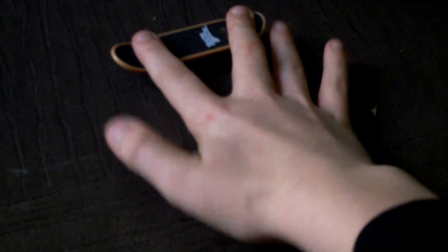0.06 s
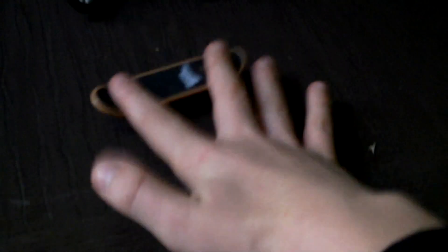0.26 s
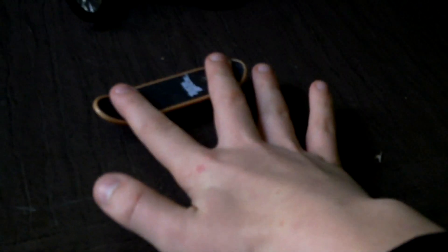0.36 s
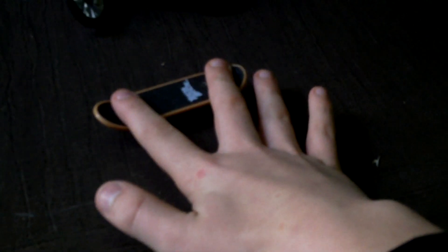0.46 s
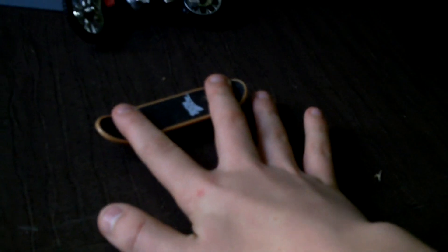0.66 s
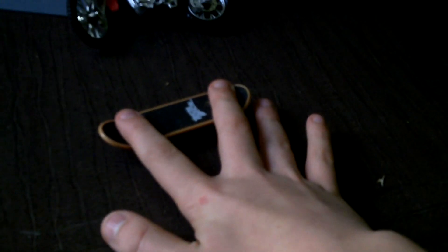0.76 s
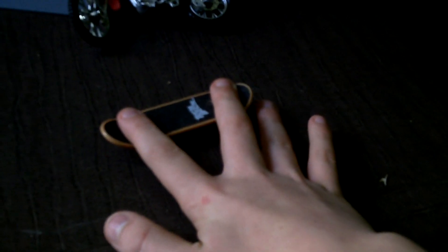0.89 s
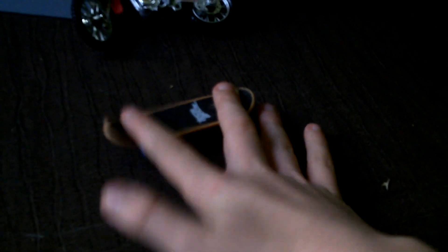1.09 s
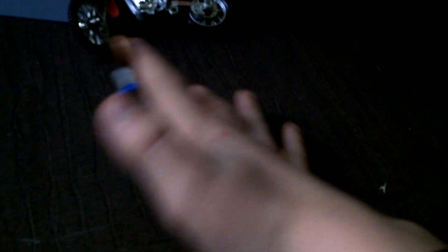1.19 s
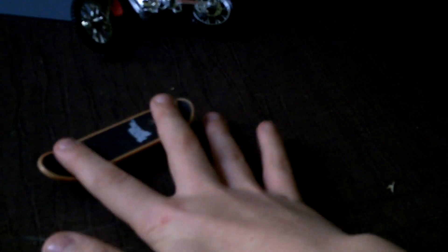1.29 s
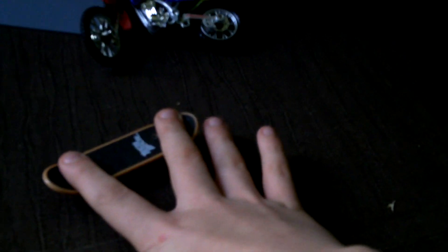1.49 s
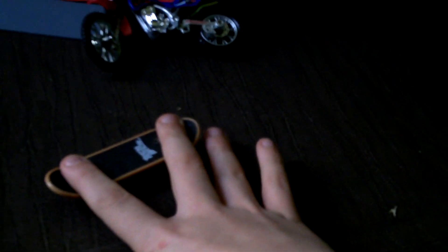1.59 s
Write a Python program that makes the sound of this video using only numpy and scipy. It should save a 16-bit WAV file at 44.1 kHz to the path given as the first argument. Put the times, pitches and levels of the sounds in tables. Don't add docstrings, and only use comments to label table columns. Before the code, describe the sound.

A finger-sized toy skateboard is popped and landed twice on a hard floor. A metallic tick at 0.18 s and a swelling scrape lead to a tail snap at 0.23, then two loud, bright clacks at 0.32 and 0.35 with dull thuds. After near silence, a rattle at 1.19, a snap at 1.25, and clacks at 1.33 and 1.37. Close small microphone, short room echoes, steady faint hiss.

```python
import sys
import numpy as np
from scipy import signal
from scipy.fft import rfft, irfft
from scipy.io import wavfile
from scipy.ndimage import uniform_filter1d

SR = 44100
rng = np.random.default_rng(int(sys.argv[2]) if len(sys.argv) > 2 else 0)


def materialize(psi):
    bounded = np.clip(np.atleast_2d(psi).T, -1, 1)
    quanta = np.round(bounded * 32767).astype(np.int16)
    wavfile.write(sys.argv[1], SR, quanta)


def convert_level_to_amplitude(level_db):
    exponent = np.asarray(level_db, float) / 20
    return 10 ** exponent


N = 72765


def level(x, db):
    return x * convert_level_to_amplitude(db) / np.sqrt(np.mean(x ** 2))


def unit(x):
    return x / np.sqrt(np.sum(x ** 2))


def band(x, hz, width):
    hz = min(hz, 0.45 * SR)
    return signal.lfilter(*signal.iirpeak(hz, hz / max(width, 20), fs=SR), x)


def walk(rate):
    hold = int(SR / rate)
    steps = np.repeat(rng.standard_normal(N // hold + 1), hold)
    return uniform_filter1d(steps, hold)[:N]


def contacts(rows, ring):
    size = 4096
    chatter_db, rough_db = -14, 2.5
    skirt, narrow = 2.9, 0.98
    t = np.arange(size) / SR
    start = int(rows[0][0] * SR)
    pushes = []
    for at_s, db, chatter_ms, tilt_db in rows:
        grain, rough = rng.standard_normal((2, size))
        push = grain * convert_level_to_amplitude(chatter_db + rough_db * rough) * np.exp(-t * 1000 / chatter_ms)
        push[0] = 1
        lag = max(int(at_s * SR) - start, 0)
        pushes.append((np.pad(push, (lag, 0))[:size] * convert_level_to_amplitude(db), tilt_db))
    hit = np.zeros(size)
    for k, (hz, width, db) in enumerate(ring):
        octaves = np.log2(hz / 4000)
        push = sum(p * convert_level_to_amplitude(tilt_db * octaves) for p, tilt_db in pushes)
        tone = band(band(push, hz, width * skirt), hz, width * narrow)
        hit += (-1) ** k * convert_level_to_amplitude(db) * unit(tone) * np.sqrt(width)
    loudest_db = max(row[1] for row in rows)
    out = np.zeros(N + size)
    out[start:start + size] = hit * convert_level_to_amplitude(loudest_db) / np.abs(hit).max()
    return out[:N]


# start in seconds, level in dB, chatter in ms, brightness in dB per octave.
FRONT_WHEELS = [(0.3236, -21, .7, -2), (0.3246, -22, .7, 2), (0.3252, -27, .5, -3), (0.3276, -35, 1., 3),
                (0.3302, -36, 1., 3), (0.3314, -38, .6, 5)]
NOSE_WHEELS = [(1.3329, -30, .6, -1), (1.3339, -19, .5, 1), (1.3355, -29, .5, -4), (1.3368, -29, .5, 0)]
BACK_WHEELS = [(0.3469, -28, .2, 0), (0.3472, -16, .3, 1), (0.3480, -22, .4, -3), (0.3486, -24, .4, -5),
               (0.3494, -27, .4, -4), (0.3500, -30, .3, -3)]
TAIL_WHEELS = [(1.3669, -27, .4, 2), (1.3675, -20, .4, 0), (1.3680, -23, .3, 0), (1.3686, -26, .5, -4),
               (1.3691, -27, .4, -3), (1.3700, -29, .4, -3)]
# centre in Hz, width in Hz, level in dB.
FRONT_RING = [(793, 147, -10), (1570, 160, -0.5), (2295, 220, 1.5), (3500, 220, -6.5), (4518, 280, 2.5),
              (5490, 300, -5), (6260, 210, 0), (6800, 450, 0), (9240, 1150, -8.5), (10840, 1400, -13),
              (12650, 1400, -16), (14700, 590, -24)]
NOSE_RING = [(517, 94, -18), (878, 123, -1), (1570, 240, -1.1), (2240, 310, -9), (3380, 380, -10.5),
             (4600, 230, -8), (5640, 270, -10.5), (6580, 260, 2), (7110, 190, -3), (9030, 830, -8.5),
             (10464, 560, -2.5), (11200, 740, -10), (12800, 410, -9), (14900, 800, -20)]
BACK_RING = [(807, 310, -9.5), (1200, 175, -2.5), (1704, 340, -2), (1947, 360, 1), (3264, 200, -3.5),
             (4500, 520, -13), (5390, 250, -4), (6060, 1270, -9), (7220, 620, -5.5), (9350, 1000, -10),
             (10430, 590, -5.5), (12070, 1200, -9.5), (13700, 1000, -25)]
TAIL_RING = [(826, 1070, -4), (1440, 1440, 2), (2320, 990, 1.5), (3350, 560, -3.5), (5170, 500, -1),
             (5730, 340, -2), (6130, 1130, -0.5), (7290, 530, 3), (9000, 630, -7), (10800, 520, -2),
             (12560, 1550, -10.5), (13760, 510, -11)]


def landings():
    return [(convert_level_to_amplitude(0.8) * contacts(FRONT_WHEELS, FRONT_RING), -2),
            (convert_level_to_amplitude(1.1) * contacts(NOSE_WHEELS, NOSE_RING), -2),
            (convert_level_to_amplitude(-0.6) * contacts(BACK_WHEELS, BACK_RING), -2.15),
            (convert_level_to_amplitude(0.2) * contacts(TAIL_WHEELS, TAIL_RING), -1.5)]


# start in seconds, level in dB, chatter in ms, brightness in dB per octave.
POPS = [(0.2338, -34, 1.2, -1), (0.2346, -35.5, 1.5, -1), (0.2367, -43, 1.5, 1), (0.2387, -42, 1.5, 2),
        (0.2425, -46, 2.5, 3)]
SNAPS = [(1.2505, -32, 1.0, -1), (1.2513, -34, 1.5, 0), (1.2532, -39, 1.5, 1), (1.2558, -39, 1.5, 2)]
# centre in Hz, width in Hz, level in dB.
POP_RING = [(440, 85, -11.5), (790, 230, -8.5), (1450, 300, -7.5), (2120, 300, -1), (2690, 860, -5),
            (3200, 370, 5), (4340, 440, 0.5), (6330, 620, -4), (7070, 300, 0), (8300, 1600, -9),
            (10200, 1100, -9), (12540, 950, -10.5), (14200, 520, -17)]
SNAP_RING = [(438, 120, -11), (1070, 140, -22), (1670, 166, -4.5), (2100, 160, -4.5), (3010, 480, 0),
             (3860, 350, -12), (4440, 430, -6), (5730, 610, -7), (7050, 440, -3.5), (8350, 940, -19),
             (9940, 950, -8.5), (12130, 540, -11), (13600, 800, -17)]


def tail_pops():
    return [(convert_level_to_amplitude(0.1) * contacts(POPS, POP_RING), 0),
            (convert_level_to_amplitude(0.93) * contacts(SNAPS, SNAP_RING), 0)]


# start in seconds, level in dB, chatter in ms, brightness in dB per octave.
THUDS = [
    (0.2368, -72, 2.6, 0),
    (0.324, -48, 1.1, 0),
    (0.3476, -43.5, 3.1, 0),
    (1.2504, -56.5, 4.1, 0),
    (1.335, -48.5, 1.46, 0),
    (1.3671, -38, 0.93, 1),
]
# centre in Hz, width in Hz, level in dB.
THUD_RING = [(290, 250, -11.5), (522, 200, 0), (805, 260, -0.5), (1363, 820, 0.5)]


def floor_thuds():
    return sum(contacts([row], THUD_RING) for row in THUDS)


# start in seconds, level in dB, chatter in ms, brightness in dB per octave.
TICKS = [
    (0.1837, -45, 1.5, 0),
    (0.3190, -57, .6, 2),
]
RATTLES = [
    (1.1912, -52, .8, 2),
    (1.1934, -46, 1.6, 1),
    (1.2390, -55, .8, 5),
]
# centre in Hz, width in Hz, level in dB.
TICK_RING = [(3670, 620, 0.5), (5750, 400, -3), (7050, 730, 9.5), (9200, 2100, -5), (12100, 1400, -4),
             (13000, 640, -9)]
RATTLE_RING = [(4700, 400, 1.5), (6000, 500, -1), (6960, 690, 3.5), (9860, 600, -1), (10700, 450, -1),
               (11900, 980, -3), (13600, 1700, -11)]


def truck_ticks():
    ticks = sum(contacts([row], TICK_RING) for row in TICKS)
    return ticks + sum(contacts([row], RATTLE_RING) for row in RATTLES)


# start in seconds, end in seconds, level at the end in dB,
# rise up to the end in dB.
SCRAPES = [
    (0.186, 0.231, -55, 26),
    (1.212, 1.27, -81, -15),
]
# centre in Hz, width in Hz, level in dB.
SCRAPE_RING = [(464, 100, -7), (779, 78, 2), (1583, 270, 0.5), (2005, 120, -3), (3630, 1200, -3),
               (7300, 630, -24)]


def scrapes():
    t = np.arange(N) / SR
    env = np.zeros(N)
    for t0, t1, db, rise_db in SCRAPES:
        to_go = np.clip((t1 - t) / (t1 - t0), 0, 1)
        onset = np.clip((t - t0) / 0.003, 0, 1)
        env += convert_level_to_amplitude(db - rise_db * to_go) * onset * (t < t1)
    grit = rng.standard_normal(N) * convert_level_to_amplitude(0.88 * walk(200))
    rung = sum(convert_level_to_amplitude(db) * band(grit, hz, width) / np.sqrt(width) for hz, width, db in SCRAPE_RING)
    return env * level(rung, 0)


# start in seconds, level in dB, chatter in ms, brightness in dB per octave.
BRUSHES = [
    (0.2095, -55, 3., 0),
    (0.2150, -52, 4., 0),
    (0.2245, -49, 3., 0),
    (0.2275, -49, 3., 0),
    (1.2152, -54, 2.5, 4),
    (1.2440, -58, 2.5, 2),
]


def tail_brushes():
    return sum(contacts([row], SCRAPE_RING[:4]) for row in BRUSHES)


# centre in Hz, width in Hz, level in dB.
ROOM_COLOUR = [(720, 230, 1), (1190, 170, 3), (2010, 82, 3.5), (2520, 250, 5.5), (3130, 220, -3.5),
               (3710, 710, 4), (4230, 380, -6), (5130, 360, -12), (6650, 1900, 1.5), (7400, 290, -2.5)]


def coloured(tail):
    wave = rfft(tail)
    hz = np.fft.rfftfreq(len(tail), 1 / SR)
    fine, broad = (uniform_filter1d(np.abs(wave) ** 2, size=k) for k in (100, 500))
    db = sum(gain * np.exp(-((hz - centre) / width) ** 2 * 2) for centre, width, gain in ROOM_COLOUR)
    out = irfft(wave * np.sqrt(broad / fine) * convert_level_to_amplitude(db), len(tail))
    return out * (np.arange(len(tail)) < len(tail) // 2 + len(tail) // 4)


# frequency in Hz, time to fall 60 dB in seconds, level in dB.
ROOM = [(256, 0.8, -11), (524, 0.21, -2.5), (1170, 0.32, -2.5), (1710, 0.33, -16), (3660, 0.25, 2.5),
        (6850, 0.27, -7.5), (9740, 0.14, 10.5), (13800, 0.12, -14.5)]
ECHO_MS = (3, 5.5, 13.5, 16, 30)
# level in dB, smear in ms.
ECHOES = [(-20, 1.2), (-20.5, 2), (-23, 0.7), (-16, 0.73), (-21.5, 4.4)]
# delay in ms, centre in Hz, width in Hz, level in dB.
DULL_ECHOES = [(15.3, 670, 190, -12), (16.4, 1110, 150, -16), (28.49, 1310, 200, -7.5),
               (30, 2400, 450, -20)]


def room(x):
    start_ms, build_ms, tail_db = 0.39, 8.7, -30.5
    t = np.arange(SR // 2) / SR
    table = np.array(ROOM)
    log_hz = np.log(table[:, 0])
    tail = np.zeros(len(t))
    for hz in 180 * 2 ** np.arange(0, 6.6, 0.5):
        t60 = np.interp(np.log(hz), log_hz, table[:, 1])
        db = np.interp(np.log(hz), log_hz, table[:, 2])
        noise = band(band(rng.standard_normal(len(t)), hz, hz / 2), hz, hz / 2)
        tail += noise * convert_level_to_amplitude(db - 60 * t / t60)
    tail *= np.clip((t * 1000 - start_ms) / build_ms, 0, 1) * convert_level_to_amplitude(tail_db)
    grain = rng.standard_normal(len(t))
    for ms, (db, smear) in zip(ECHO_MS, ECHOES):
        late = t * 1000 - ms
        fade = (late > 0) * np.exp(-np.abs(late) / smear)
        tail += convert_level_to_amplitude(db) * grain * fade / np.sqrt(smear * SR / 2000)
    tail = coloured(tail)
    for ms, hz, width, db in DULL_ECHOES:
        click = np.zeros(len(t))
        click[int(ms * SR / 1000)] = 1
        tail = tail + convert_level_to_amplitude(db) * band(click, hz, width)
    return signal.fftconvolve(x, tail)[:N]


# centre in Hz, width in Hz.
NOTCHES = [(7950, 140), (12400, 580)]


def microphone(heard):
    for hz, width in NOTCHES:
        heard = heard - band(heard, hz, width)
    return signal.sosfilt(signal.butter(4, 280, "high", fs=SR, output="sos"), heard)


# frequency in Hz, level in dB.
HISS = [(20, -24), (60, -26.5), (120, -21), (200, -13.5), (400, -5.5), (1020, -3), (3830, -12),
        (15000, -22.5)]


def hiss():
    table = np.array(HISS)
    hz = np.fft.rfftfreq(N, 1 / SR)
    shape = convert_level_to_amplitude(np.interp(np.log(hz + 1), np.log(table[:, 0]), table[:, 1]))
    base = level(irfft(rfft(rng.standard_normal(N)) * shape, N), 0)
    bump = level(band(rng.standard_normal(N), 8390, 900), -12)
    top_cut = signal.ellip(8, 0.3, 60, 14670, fs=SR, output="sos")
    dull = signal.sosfilt(top_cut, base + bump)
    flicker = convert_level_to_amplitude(0.6 * walk(45.27))
    return level(dull * flicker, -67.5)


def hum():
    return convert_level_to_amplitude(-96.5) * np.sqrt(2) * np.sin(2 * np.pi * 202 * np.arange(N) / SR)


def scene():
    ticks = truck_ticks()
    soft = tail_brushes() + scrapes() + floor_thuds()
    parts = [(ticks, -0.5), (soft, 0)] + tail_pops() + landings()
    direct = sum(x for x, _ in parts)
    to_room = sum(convert_level_to_amplitude(room_db) * x for x, room_db in parts)
    heard = microphone(direct + room(to_room))
    return (heard + hiss() + hum())[None, :]


def roll_off(x):
    return signal.sosfilt(signal.butter(12, 16560, fs=SR, output="sos"), x)


def record(dry):
    top_cut = signal.ellip(8, 0.2, 70, 16100, fs=SR, output="sos")
    mix = signal.sosfilt(top_cut, dry)
    return roll_off(mix)


dry = scene()
out = record(dry)
materialize(out)
```